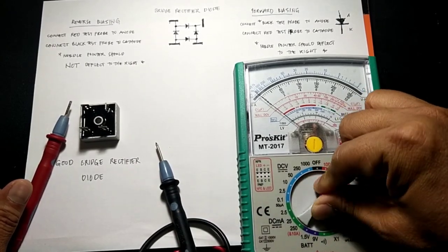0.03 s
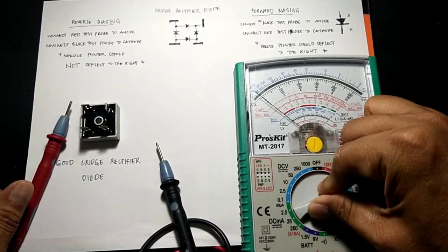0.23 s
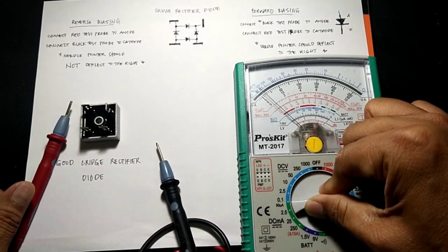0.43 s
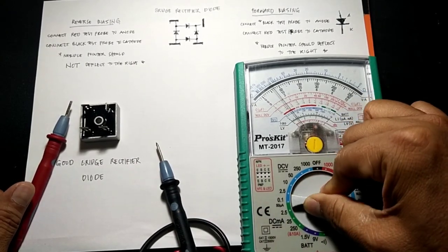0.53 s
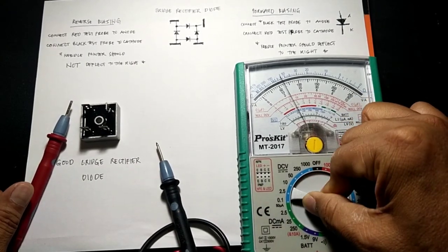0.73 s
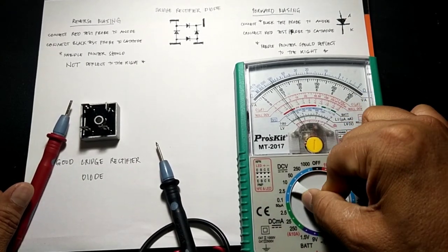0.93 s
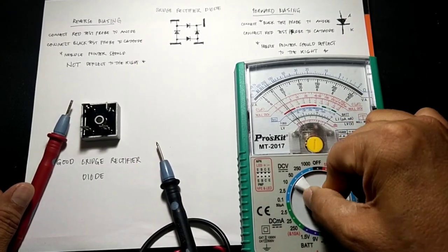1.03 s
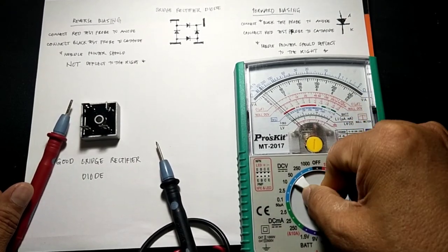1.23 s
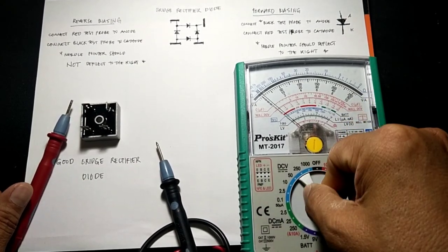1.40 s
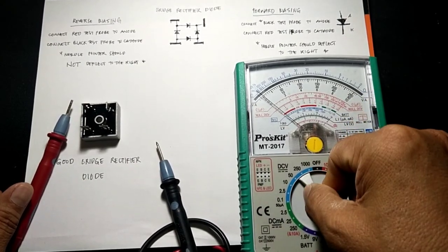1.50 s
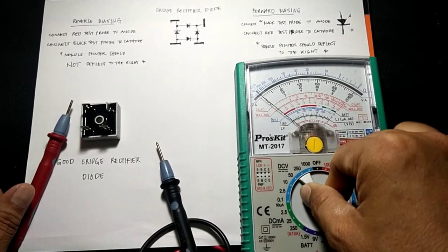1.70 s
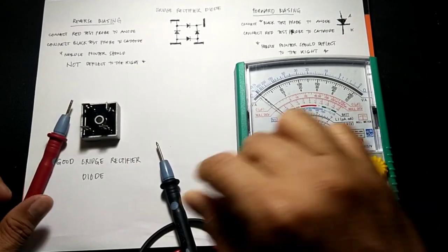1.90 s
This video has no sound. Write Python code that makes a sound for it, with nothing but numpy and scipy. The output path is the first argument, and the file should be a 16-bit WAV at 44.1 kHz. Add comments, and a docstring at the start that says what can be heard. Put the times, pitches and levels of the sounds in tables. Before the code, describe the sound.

A multimeter's plastic rotary knob clicks through eight notches in a quiet room.

```python
"""Turning the range knob of a multimeter

A plastic knob passes eight detents on a desk in a small, quiet room. At each, a sprung ball slips
off its ridge with a tick, then snaps into the next notch and excites the modes of the case.
The knob scrapes and ticks between detents, fingers bump it twice, and a faint tone rises at the end."""
import sys
import numpy as np
from scipy import signal
from scipy.fft import rfft, irfft
from scipy.io import wavfile
from scipy.ndimage import uniform_filter1d

SR = 44100
rng = np.random.default_rng(int(sys.argv[2]) if len(sys.argv) > 2 else 0)


def wrap_up_sound(samples):
    """Save the sound to the file named by the first command line argument, as 16-bit audio."""
    columns = np.atleast_2d(samples).T
    # keep every value between -1 and 1, then stretch to whole-number steps
    tamed = np.clip(columns, -1, 1)
    steps = np.round(tamed * 32767).astype(np.int16)
    wavfile.write(sys.argv[1], SR, steps)


N = 85995

# Each row: snap time in seconds, lead of the slip in seconds, crack gain in dB, crack tilt in dB per
# octave, thud frequency in Hz, thud gain in dB, knob frequency in Hz, knob gain in dB, case gain in dB.
SNAPS = [(0.0563, 0.0019, 2, 2, 896, -9, 1750, -1, -1.5),
         (.1597, 0.0018, 2.5, 1.5, 729, -3, 1595, -3.5, -1),
         (0.311, 0.0025, 0.5, 1, 711, -6, 1020, -2.5, 1), (0.523, 0.0023, 1.5, 2, 727, -1, 1360, -2, -1),
         (.7144, 0.0029, 1, 2.6, 706, 0, 1376, 0.5, 0.5), (0.928, .0029, 0, 2, 725, 0.5, 1600, -0.5, 0),
         (1.0940, .0027, 1.5, 3.5, 729, -2, 1547, 5, -6), (1.36, .0032, -0.5, 1.86, 742, -9, 1468, 2, -6)]
# Spectrum of the rubbing knob. Each row: frequency in Hz, relative level in dB.
FRICTION_SPECTRUM = [(100, -22.5), (400, 15), (750, 8), (1200, 9.5), (2000, 0), (3500, -5), (6000, -17),
                     (15000, -31)]


def amp(db):
    """Amplitude grows tenfold for every 20 dB."""
    return 10 ** (np.asarray(db) / 20)


def on_log(f, points):
    """Interpolation of (Hz, value) points on a logarithmic frequency axis."""
    hz, value = np.array(points, float).T
    return np.interp(np.log(np.maximum(f, 1)), np.log(hz), value)


def colour(x, points):
    """A minimum-phase filter imposes a (Hz, dB) shape at unit power gain."""
    size = 4096
    gain = amp(on_log(np.fft.rfftfreq(size, 1 / SR), points))
    cepstrum = irfft(np.log(gain))
    cepstrum[1:size // 2] *= 2
    cepstrum[size // 2 + 1:] = 0
    response = irfft(np.exp(rfft(cepstrum)))
    return signal.fftconvolve(x, response / np.linalg.norm(response))[:N]


def since(start):
    """Time in seconds from an onset."""
    return np.arange(N) / SR - start


def fade(t, t60):
    """Exponential decay from t = 0, by 60 dB in t60 seconds."""
    return (t >= 0) * np.exp(-np.log(1000) * np.clip(t / t60, 0, 10))


def noise():
    """White Gaussian noise of unit variance."""
    return rng.standard_normal(N)


def ring(start, modes, rise=1e-5):
    """Free vibration is a sum of damped modes (Hz, dB, t60); a softer push builds it more slowly."""
    out, first = np.zeros(N), max(int(start * SR), 0)
    t = np.arange(min(SR // 4, N - first)) / SR
    swing = sum(amp(db) * fade(t, t60) * np.sin(2 * np.pi * hz * t) for hz, db, t60 in modes)
    out[first:first + len(t)] = swing * (1 - np.exp(-t / rise))
    return out


def detents():
    """Impact excitation: the ball scrapes up a ridge, slips and snaps home; case and knob ring."""
    rise_s, hold_s = 0.00022, 0.0009
    knob_t60, thud_t60, thud_lead_s = 0.018, 0.02, 0.00026
    scrape_width_s = 0.0031
    cracks, body, climb = 0, 0, 0
    for start, slip, crack_db, tilt, thud_hz, thud_db, knob_hz, knob_db, case_db in SNAPS:
        t = since(start)
        snap = np.clip(1 + t / rise_s, 0, 1) * fade(np.maximum(t - hold_s, 0), t60=0.0046)
        slip_tick = amp(-6) * fade(t + slip, t60=0.011)
        rattle = amp(-5.5) * fade(t - hold_s, t60=0.02)
        force = contact(snap) * (t > -slip) + (slip_tick + rattle) * noise()
        cracks += amp(crack_db - 24.5) * crack(force, tilt)
        body += amp(case_db - 27.5) * ring(start, case_modes())
        body += ring(start, [(knob_hz, knob_db - 28.5, knob_t60)])
        body += ring(start - thud_lead_s, [(thud_hz, thud_db - 11.5, thud_t60)], rise=0.0014)
        climb += (t < 0) * np.exp(-abs(t + slip) / scrape_width_s)
    scrape = amp(-43.5) * colour(climb * noise(), FRICTION_SPECTRUM)
    return cracks + radiate(body) + scrape


def contact(envelope):
    """A burst of tiny hard contacts spreads its energy almost evenly over frequency."""
    evenness = 0.7
    spectrum = rfft(envelope * noise())
    burst = irfft(spectrum / (abs(spectrum) + 1e-12) ** evenness, N)
    return burst * np.linalg.norm(envelope) / np.linalg.norm(burst)


def crack(force, tilt):
    """A brief force gives a broadband crack, brightened by a tilt in dB per octave."""
    # Each row: frequency in Hz, relative level in dB before the tilt.
    spectrum = [(60, -23.5), (200, 2.5), (320, -6), (500, 6), (900, 4.5), (1400, 4), (2300, 3.5), (2900, 0),
                (4400, 2.5), (6300, -3), (7500, -1.5), (10800, -6.5), (12800, -17.5), (14800, -20),
                (16500, -9)]
    return colour(force, [(hz, db + tilt * np.log2(hz)) for hz, db in spectrum])


def case_modes():
    """The modal response of case and spring varies, as each notch strikes a slightly different place."""
    # Each row: frequency in Hz, relative level in dB, t60 in seconds.
    modes = [(552, -14, 0.041), (656, -6, 0.032), (890, -13, .026), (1130, -26, .028), (1815, -10, 0.02),
             (2425, -8, 0.012), (3620, -10, 0.026), (4310, -1.5, 0.015), (4776, -5.5, 0.014),
             (5570, -9, 0.011), (7170, -3, 0.01), (9290, 1, 0.0076), (10870, 0, 0.0051)]
    detune, scatter_db = 0.012, 1
    draws = rng.standard_normal((len(modes), 2))
    return [(hz * (1 + detune * a), db + scatter_db * b, t60)
            for (hz, db, t60), (a, b) in zip(modes, draws)]


def radiate(x, cutoff_hz=485):
    """A body small against the wavelength radiates little bass."""
    return signal.sosfilt(signal.butter(4, cutoff_hz, "high", fs=SR, output="sos"), x)


def ticks():
    """Friction makes short, dull ticks as the knob takes up its play."""
    # Each row: start in seconds, relative level in dB, t60 in seconds.
    rubs = [(.001, -2, 0.14), (0.487, -2, 0.2), (0.623, -7, 0.045), (0.6604, 2.5, 0.079), (.693, 2, 0.035),
            (.882, -2, 0.045), (1.069, -1.5, 0.06), (1.287, -5.5, 0.073), (1.43, -2, 0.053),
            (1.534, -10, 0.084), (1.561, -6, 0.055), (1.819, -4.5, 0.13)]
    envelope = sum(amp(db) * fade(since(start), t60) for start, db, t60 in rubs)
    return amp(-52) * colour(envelope * noise(), FRICTION_SPECTRUM)


def fingers():
    """Soft impacts excite low modes, a hard nail clicks, and skin friction marks each new grip."""
    # Each row: start in seconds, bump gain in dB, nail gain in dB.
    touches = [(0.7816, -35.5, -53), (1.7303, -44, -43)]
    # Each row: frequency in Hz, relative level in dB, t60 in seconds.
    modes = [(467, -5.5, 0.047), (710, 4, 0.014), (840, -3.5, 0.016), (1330, -27, 0.025),
             (1600, -22, 0.047)]
    # Each row: centre in seconds, half width in seconds, level in dB.
    grips = [(0.0, 0.039, -58.5), (1.708, 0.049, -57.5)]
    # Each row of both spectra: frequency in Hz, relative level in dB.
    nail_spectrum = [(100, -22), (1900, -18), (2500, -6), (3300, 0), (4200, -24), (8000, -28.5),
                     (16000, -50)]
    skin_spectrum = [(60, -7.5), (200, -7), (470, -4), (900, -20.5), (2000, -34.5), (8000, -41)]
    bumps = sum(amp(db) * ring(start, modes, rise=0.0004) for start, db, _ in touches)
    nail = sum(amp(db) * fade(since(start), t60=0.0095) for start, _, db in touches)
    slide = sum(amp(db) * np.exp(-(since(centre) / width) ** 2) for centre, width, db in grips)
    return bumps + colour(contact(nail), nail_spectrum) + colour(slide * noise(), skin_spectrum)


def desk():
    """Structure-borne sound: the desk takes up each snap as a dull rumble."""
    # Each row: frequency in Hz, relative level in dB.
    spectrum = [(25, -8), (70, 1), (110, -5.5), (200, -8), (500, -65), (2000, -83)]
    envelope = sum(fade(since(start), t60=0.14) for start, *_ in SNAPS)
    return amp(-56.5) * colour(envelope * noise(), spectrum)


def faint_tone():
    """A thin tone swells and rises slightly, wavering by random frequency modulation."""
    # Each row: time in seconds, frequency in Hz, RMS level in dB.
    contour = [(1.76, 600, -72), (1.80, 599, -65.5), (1.855, 612, -65), (1.88, 632, -67.5),
               (1.95, 620, -59.5)]
    times, hz, db = np.array(contour).T
    t, depth = since(0), 0.008
    waver = uniform_filter1d(noise(), size=400)
    pitch = np.interp(t, times, hz) * (1 + depth * waver / waver.std())
    envelope = (t > times[0]) * amp(np.interp(t, times, db))
    return envelope * np.sqrt(2) * np.sin(2 * np.pi * np.cumsum(pitch) / SR)


def room(x):
    """Reverberation: early reflections and a short diffuse tail that dies sooner in the treble."""
    # Each row: delay in seconds, gain in dB.
    reflections = [(.0083, -17), (.0097, -23)]
    # Each row: frequency in Hz, t60 in seconds.
    decay_times = [(200, 0.45), (700, 0.19), (2000, 0.17), (4000, 0.18), (8000, 0.17), (14000, 0.14)]
    # Each row: frequency in Hz, relative level in dB.
    tail_spectrum = [(100, 4.5), (280, -4), (430, 3), (720, -4.5), (1150, -0.5), (2600, -3.5), (3400, 1),
                     (3800, 6), (4250, -0.5), (5500, -1), (9000, -4), (12000, -3), (16000, 1)]
    tail_db, onset_s = -9.5, 0.0052
    t, f = since(0), np.fft.rfftfreq(N, 1 / SR)
    diffuse, tail = rfft(noise()), 0
    for k, (_, t60) in enumerate(decay_times):
        band = on_log(f, [(hz, j == k) for j, (hz, _) in enumerate(decay_times)])
        tail += irfft(diffuse * band, N) * fade(t, t60)
    build_up = 1 - np.exp(-(t / onset_s) ** 2)
    tail = colour(tail * build_up, tail_spectrum)
    response = amp(tail_db) * tail / np.linalg.norm(tail)
    for delay, db in reflections:
        response[int(delay * SR)] += amp(db)
    return x + signal.fftconvolve(x, response)[:N]


def background():
    """Ambient noise: low room rumble and hiss sink to a steady level."""
    # Each row: frequency in Hz, relative level in dB.
    spectrum = [(24, -12), (40, -1), (216, -5), (502, -20.5), (784, -10), (933, -16), (1460, -19),
                (2060, -24.5), (2450, -24.5), (3390, -28), (3740, -28.5), (4030, -30), (15000, -33.5)]
    # Each row: time in seconds, level in dB.
    levels = [(0, -57), (.7, -62.5), (1.2, -63), (1.95, -63)]
    times, db = np.array(levels).T
    return amp(np.interp(since(0), times, db)) * colour(noise(), spectrum)


def scene():
    """Superposition: switch and hand sound in the room, over desk, tone and background."""
    direct = detents() + ticks() + fingers()
    return (room(direct) + desk() + faint_tone() + background())[None]


def record(dry):
    """Band limiting: a steep low-pass filter cuts the top of the treble."""
    cutoff_hz = 15700
    return signal.sosfilt(signal.ellip(8, .2, 70, cutoff_hz, fs=SR, output="sos"), dry)


dry = scene()
out = record(dry)
wrap_up_sound(out)
```